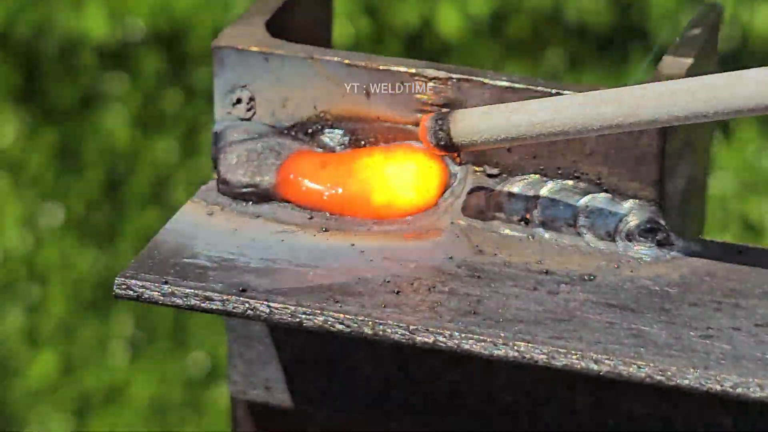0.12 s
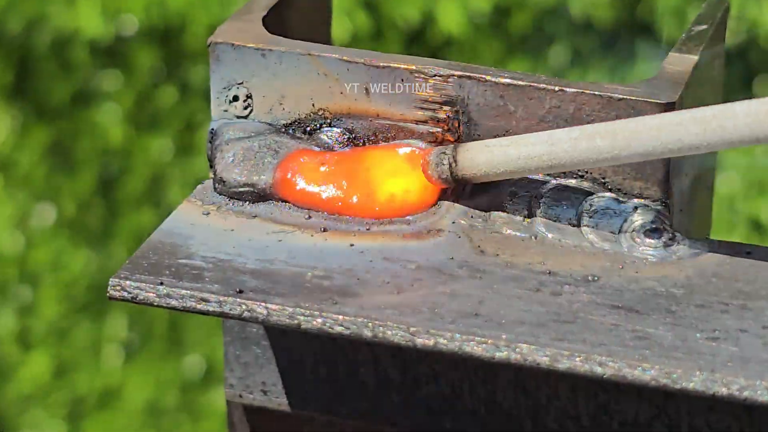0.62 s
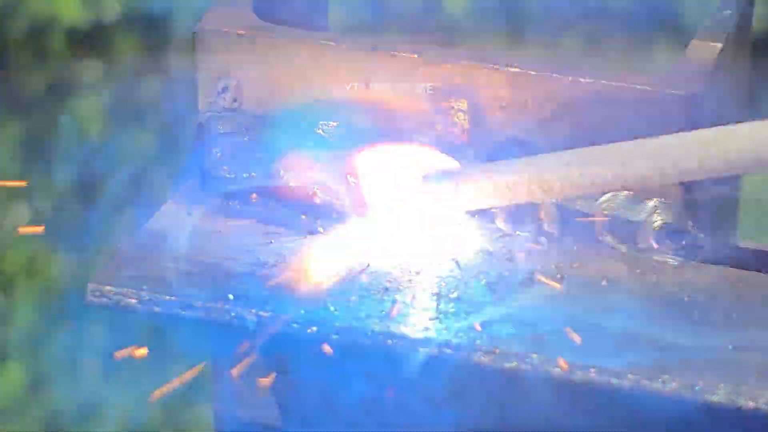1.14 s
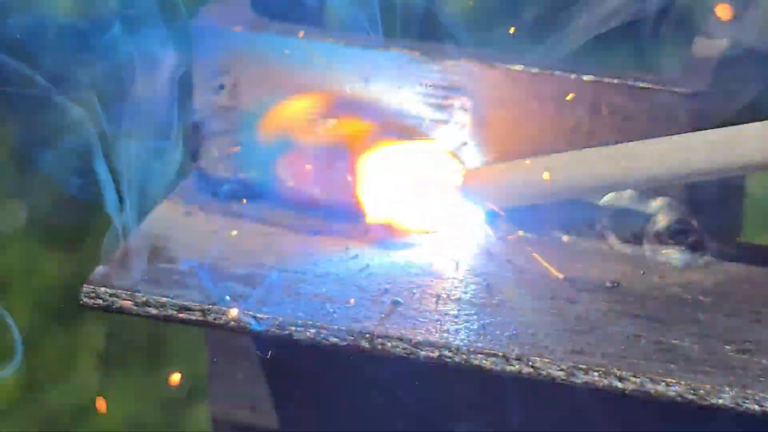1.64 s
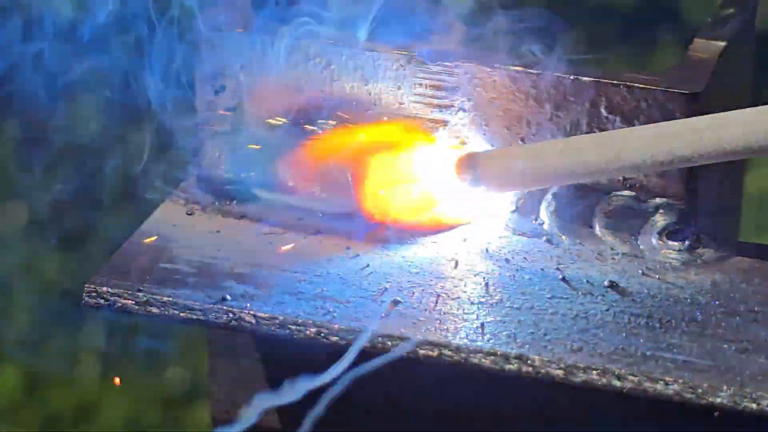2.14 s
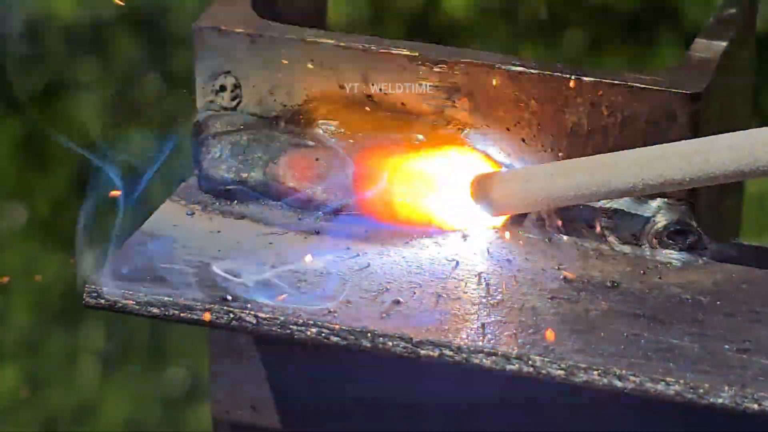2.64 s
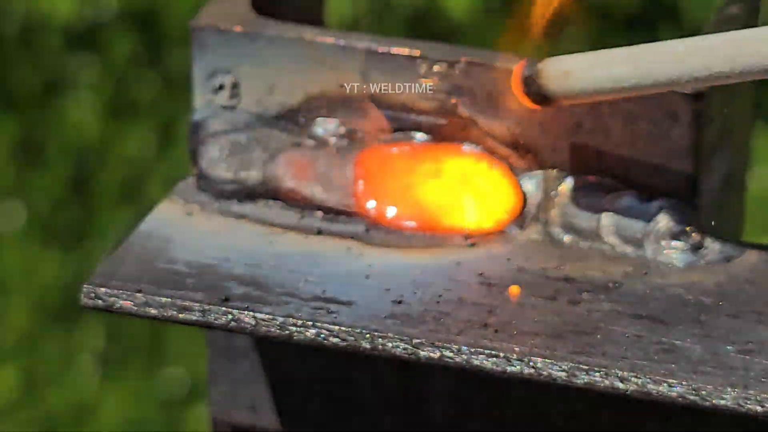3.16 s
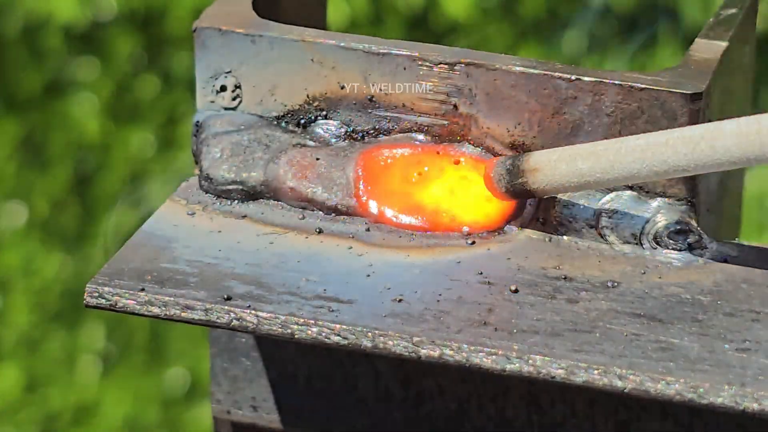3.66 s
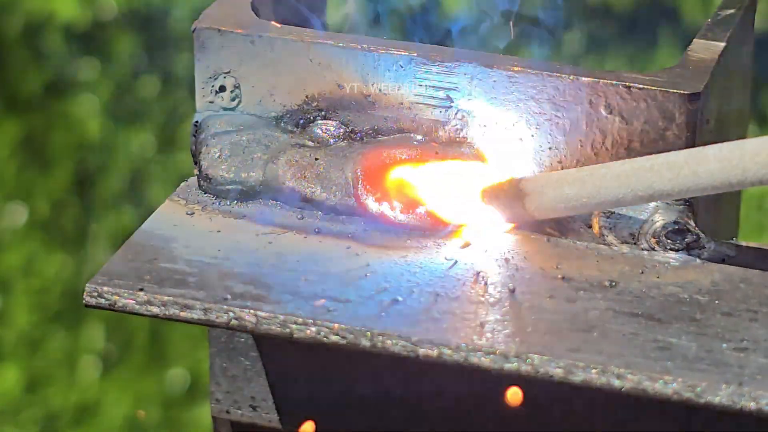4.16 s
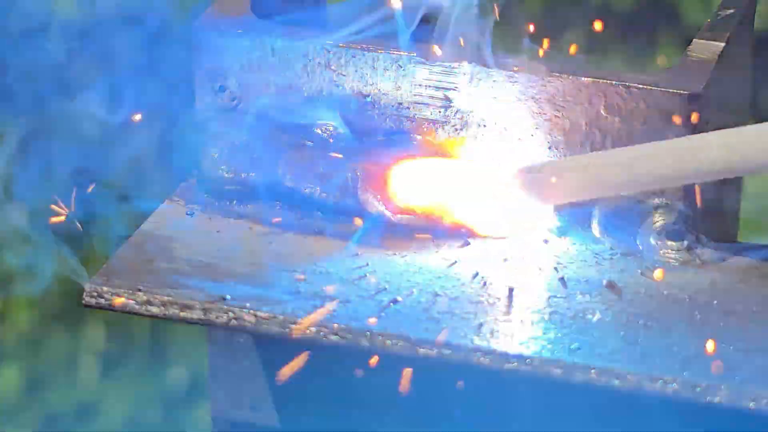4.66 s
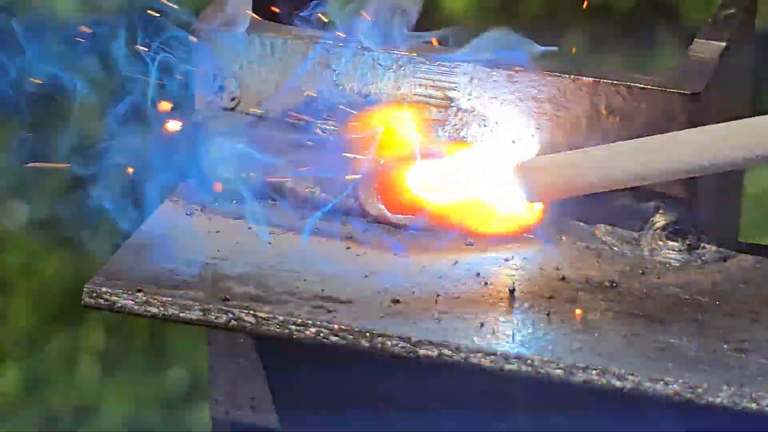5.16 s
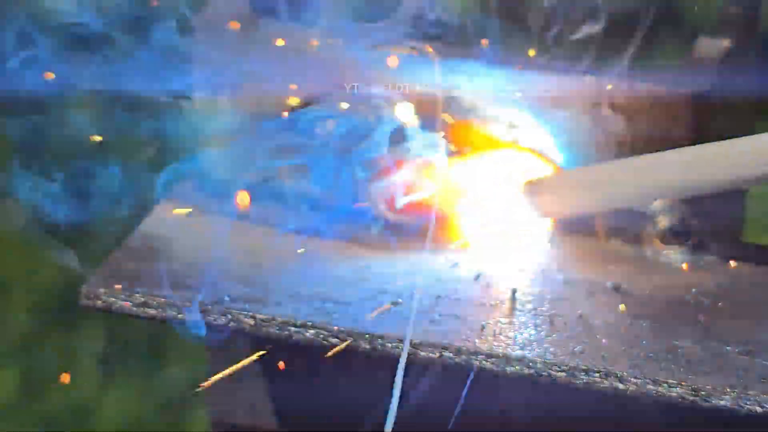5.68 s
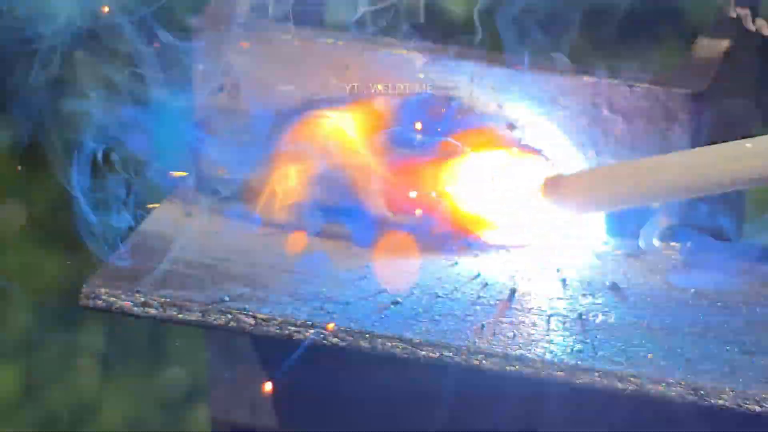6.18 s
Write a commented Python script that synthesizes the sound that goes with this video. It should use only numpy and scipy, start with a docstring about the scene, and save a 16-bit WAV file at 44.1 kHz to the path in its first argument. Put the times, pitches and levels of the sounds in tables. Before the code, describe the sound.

A welding arc strikes twice on steel in open air, hissing and snapping brightly, with near silence between and wind buffeting toward the end.

```python
"""A low wavering hum and open-air rustle come first, with wind on the microphone and a faint metallic squeak.
Then a stick electrode strikes a steel joint outdoors: noise sizzles in clumps of tiny bursts, sharp sparks ring
two resonances, and soft bands of noise make flame puffs and pool sputters. After the first weld a thin fizz sinks
and the background fades away; it returns just before the second strike. One microphone takes it all in."""
import sys
import numpy as np
from scipy import signal
from scipy.fft import rfft, irfft, next_fast_len
from scipy.io import wavfile
from scipy.ndimage import uniform_filter1d, minimum_filter1d, map_coordinates

SR = 44100
rng = np.random.default_rng(int(sys.argv[2]) if len(sys.argv) > 2 else 0)


def makeup_ratio(level_db):
    """Linear amplitude ratio for a level in decibels (20 dB per factor of ten)."""
    decades = np.asarray(level_db, float) / 20
    return 10 ** decades


def file_out(sig):
    """Save sig as 16-bit WAV at sys.argv[1]."""
    # one column per channel
    cols = np.atleast_2d(sig).T
    # limit, then scale
    lim = np.clip(cols, -1, 1)
    pcm = np.round(lim * 32767).astype(np.int16)
    wavfile.write(sys.argv[1], SR, pcm)


N = 277830  # samples, 6.3 s


def unit(x):
    """Scale to rms 1."""
    return x / np.sqrt(np.mean(x ** 2) + 1e-20)


def seconds():
    """The time of every sample."""
    return np.arange(N) / SR


def noise():
    """Fresh white noise."""
    return rng.standard_normal(N)


def wobble(rate):
    """A smooth random curve, rate knots a second."""
    knots = rng.standard_normal(int(N * rate / SR) + 4)
    return map_coordinates(knots, [np.arange(N) * rate / SR])


def curves(*tables):
    """One dB value per sample for each column; silence outside the tables."""
    t, out = seconds(), -150
    for rows in tables:
        s, *columns = np.transpose(rows)
        out = np.maximum(out, [np.interp(t, s, c, left=-150, right=-150) for c in columns])
    return out


def peaks(s, db, fall, rise=None):
    """dB per sample of swells that add in power, sloping away from their tops in dB per s."""
    coarse = np.arange(0, N, 64)
    away = coarse / SR - np.asarray(s)[:, None]
    drop = np.where(away > 0, fall * away, -(rise or fall) * away)
    power = np.sum(makeup_ratio(2 * (np.asarray(db)[:, None] - drop)), axis=0)
    return np.interp(np.arange(N), coarse, 10 * np.log10(power + 1e-30))


def filtered(x, response):
    """x times a complex response of frequency."""
    m = next_fast_len(N + 8192)
    return irfft(rfft(x, m) * response(np.fft.rfftfreq(m, 1 / SR)), m)[:N]


def coloured(x, points):
    """x through (Hz, dB) points read on a log axis."""
    f, db = np.transpose(points)
    return filtered(x, lambda hz: makeup_ratio(np.interp(np.log(hz + 1), np.log(f + 1), db)))


def resonant(x, modes):
    """x through causal (Hz, width Hz, dB) resonances, summed."""
    def response(f):
        return sum(makeup_ratio(db) * 1j * f * w / (c * c - f * f + 1j * f * w) for c, w, db in modes)
    return filtered(x, response)


def patchy(x, depth_db):
    """Random gain patches, about a kilohertz by 30 ms."""
    z = signal.stft(x, nperseg=256)[2]
    field = uniform_filter1d(rng.standard_normal(z.shape), size=7, axis=0)
    field = uniform_filter1d(field, size=10, axis=1)
    return signal.istft(z * makeup_ratio(depth_db * unit(field)), nperseg=256)[1][:N]


def spits(rate, spread_db, clump):
    """Random impulses of either sign, mostly small and rarely large, denser where clump is high."""
    chance, size, sign = rng.random(N), rng.exponential(size=N), np.sign(noise())
    height = makeup_ratio(np.minimum(spread_db * size, 4 * spread_db))
    return unit((chance < rate / SR * clump) * sign * height)


def blobs(events, life, width, offset_db):
    """Soft swells of noise, each around its own pitch; life in s, width as a share of the pitch."""
    out, t = np.zeros(N + SR), np.arange(SR // 8) / SR
    hz_axis = np.fft.rfftfreq(len(t), 1 / SR)
    swell = t / life * np.exp(1 - t / life)
    for s, db, hz in events:
        bell = 1 / (1 + ((hz_axis - hz) / (width * hz)) ** 2)
        band = irfft(rfft(rng.standard_normal(len(t))) * bell, len(t))
        out[round(s * SR):][:len(t)] += makeup_ratio(db + offset_db) * unit(band) * swell
    return out[:N]


FADE_S, RETURN_S = 2.93, 3.915  # the background dies away, then returns
FADE_DB_PER_S, FADE_DB_PER_S2 = 37, 6.5


def fade():
    """dB lost by the background between the welds; it is back within 15 ms."""
    t = seconds()
    back = np.clip(1 - (t - RETURN_S) / 0.012, 0, 1)
    since = np.clip(t - FADE_S, 0, RETURN_S - FADE_S) * back
    return -FADE_DB_PER_S * since - FADE_DB_PER_S2 * since ** 2


# Centres of the upper and lower hum tone [Hz]
HUM_TONES = (171.8, 125.5)
# Steady hum: (time [s], level [dB])
HUM_LEVEL = [(0, -52), (.75, -57), (.93, -54.5), (1.9, -51.5), (2.3, -47.5), (2.95, -45.5), (3.95, -52.5),
             (4.4, -59.5), (6.3, -58)]
# Hum swells: (time [s], upper tone level [dB], lower tone level [dB])
HUM_SWELLS = [(.05, -37, -47), (.21, -44, -61), (.46, -33, -47), (.61, -32.5, -36), (.84, -57, -45),
              (1.39, -47, -50), (2.12, -33, -58), (2.44, -49, -46), (2.58, -41.5, -56),
              (2.88, -45.5, -47.5), (4.02, -52, -58.5), (4.26, -57, -60), (5.5, -51.5, -46),
              (5.74, -43.5, -42), (5.88, -52, -45), (6.07, -46, -50), (6.25, -53, -53)]
SWELL_SLOPE_DB_PER_S, LOWER_DB = 95, -0.5  # LOWER_DB shifts the steady level of the lower tone


def hum():
    """Two low tones wander in pitch and level, each with a rough halo of resonant noise."""
    out, (s, *tops) = 0, np.transpose(HUM_SWELLS)
    for hz, top_db, under_db in zip(HUM_TONES, tops, (0, LOWER_DB)):
        steady_db = curves(HUM_LEVEL)[0] + under_db
        gain = np.hypot(makeup_ratio(steady_db), makeup_ratio(peaks(s, top_db, SWELL_SLOPE_DB_PER_S)))
        phase = 2 * np.pi * np.cumsum(hz * (1 + .03 * wobble(9))) / SR
        tone = np.sqrt(2) * np.sin(phase)
        band = [(hz, 45, 0)]
        halo = unit(resonant(resonant(noise(), band), band))
        out = out + gain * makeup_ratio(1.3 * wobble(17)) * (0.62 * tone + 0.7 * halo)
    return makeup_ratio(fade()) * out


# Breeze in the open air: (time [s], level [dB])
BREEZE_LEVEL = [(0, -48.5), (.06, -47.5), (.39, -54), (.48, -48.5), (.65, -47), (.78, -49.5), (.94, -55),
                (1.44, -48.5), (1.72, -48), (1.94, -56), (2.42, -45.5), (2.92, -47), (3.92, -50),
                (4.42, -53), (4.55, -49.5), (4.8, -52), (5.3, -52.5), (5.7, -42.5), (5.95, -49.5),
                (6.3, -45.5)]
# Gusts on the microphone: (time [s], level [dB])
MIC_GUSTS = [(.03, -54), (.6, -44), (.84, -49), (1.66, -53), (2.25, -48), (2.4, -46), (2.85, -52.5),
             (4.88, -46), (4.98, -46.5), (5.36, -51), (5.46, -41), (5.65, -43), (5.75, -29), (5.9, -48),
             (6.06, -29.5), (6.26, -42)]
# Spectra of wind on the microphone, rustle and faint hiss: (frequency [Hz], relative level [dB])
WIND_SPECTRUM = [(15, -48), (25, -17), (59, 5), (110, -1.5), (140, -35), (240, -120)]
RUSTLE_SPECTRUM = [(140, -30.5), (230, -8), (370, -3.5), (480, -7), (599, -5.5), (1070, -10), (1270, -7),
                   (1580, -14), (1900, -14.5), (2200, -17), (3500, -21.5), (4550, -56), (7700, -120)]
HISS_SPECTRUM = [(1940, -29), (3300, -6.5), (3810, -2), (4510, -3), (11100, -7.5), (14300, -19),
                 (15600, -27.5)]
GUST_SLOPE_DB_PER_S, CALM_DB = 158.5, -13.5  # calm wind relative to the breeze
HISS_DB, HISS_SWINGS, TREBLE_FADES = -64.5, 2.3, 1.2  # the last two multiply dB of breeze and of fade


def surroundings():
    """One breeze drives patchy rustle, faint hiss and lumpy wind on the microphone."""
    breeze_db, = curves(BREEZE_LEVEL)
    calm_db = breeze_db + CALM_DB + 3 * wobble(4)
    gust_db = peaks(*np.transpose(MIC_GUSTS), GUST_SLOPE_DB_PER_S)
    wind_gain = np.hypot(makeup_ratio(calm_db), makeup_ratio(gust_db))
    wind_lumps = makeup_ratio(1.9 * wobble(9.3) + 2.5 * wobble(30))
    wind = unit(wind_lumps * coloured(noise(), WIND_SPECTRUM))
    rustle_lumps = makeup_ratio(.8 * wobble(25) + 0.9 * wobble(5.7))
    rustle = unit(rustle_lumps * coloured(patchy(noise(), depth_db=2.0), RUSTLE_SPECTRUM))
    hiss = unit(coloured(noise(), HISS_SPECTRUM))
    hiss_db = HISS_DB + HISS_SWINGS * (breeze_db - breeze_db.mean()) + TREBLE_FADES * fade()
    return makeup_ratio(fade()) * (wind_gain * wind + makeup_ratio(breeze_db) * rustle) + makeup_ratio(hiss_db) * hiss


# Squeak resonances, passed twice: (frequency [Hz], width [Hz], level [dB])
SQUEAK_RESONANCES = [(2863, 44, -4), (3060, 140, -7), (3370, 60, -21), (7030, 80, -13)]


def squeak():
    """A faint thin metallic squeak: noise in a few narrow lines."""
    lines = resonant(resonant(noise(), SQUEAK_RESONANCES), SQUEAK_RESONANCES)
    level_db = peaks([0.19], [-44], fall=192, rise=150)  # s, dB, dB per s
    return makeup_ratio(level_db) * unit(lines)


# Two welds, one list each: (time [s], arc level [dB], spatter relative to the arc [dB])
WELDS = [
    [(0.806, -31.5, -24), (0.83, -16.5, -22.5), (1.1, -12, -28), (1.5, -14.5, -28.5), (1.95, -12.5, -31.5),
     (2.33, -14, -34), (2.64, -19, -29), (2.9, -24.5, -23.5), (2.96, -28, -23.5), (2.995, -47, -30)],
    [(3.92, -41, -36), (3.94, -15, -19), (4.22, -14, -29), (4.8, -12.5, -28.5), (5.3, -14, -30.5),
     (5.43, -12.5, -25), (5.46, -13, -33), (5.62, -16, -32), (5.67, -24.5, -34), (6.3, -23.5, -31)],
]
# The arc flares or chokes: (time [s], change [dB], half length [s])
ARC_FLARES = [(2.22, 3.5, 0.026), (2.47, -2.5, 0.016), (2.621, 5.5, 0.021), (2.727, 0.5, 0.034),
              (2.903, 3.5, 0.018), (5.381, -5.5, .04), (5.857, 8.5, 0.018), (5.915, 8.5, 0.0085),
              (5.961, -3, 0.073), (6.048, 4, 0.032), (6.105, -6.5, 0.08), (6.205, 1.5, 0.066)]


def strength():
    """The arc's level in dB with its flares and chokes."""
    t = seconds()
    change_db = sum(db * np.clip(1 - np.abs(t - s) / half, 0, 1) for s, db, half in ARC_FLARES)
    return curves(*WELDS)[0] + change_db


# Spectra of the sizzle and of the larger droplets: (frequency [Hz], relative level [dB])
SIZZLE_SPECTRUM = [(1940, -59), (2900, -31), (3400, -22), (3750, -12.5), (5140, -5), (7440, -4), (9780, 1),
                   (12900, 1), (14700, -6), (15600, -18.5)]
CRACKLE_SPECTRUM = [(410, -35.5), (700, -16.5), (1110, -5), (1320, -11), (1500, 2.5), (1700, -4),
                    (1960, 0.5), (2670, -3.5), (3500, -3), (4550, -22.5), (7700, -120)]
COLD_DB, WARM_S = -19.5, 0.3  # spatter lacking at the strike, time until the pool spits
FLURRY_DB, FLURRY_SLOPE_DB_PER_S = -16.5, 399.5  # small droplets around each spark
HOLLOW_HZ, HOLLOW_FOLLOWS = 4400, 0.41  # the sizzle's lower edge thins when little spatters


def arc():
    """The plasma column flutters and briefly chokes; this sets both the hiss and how densely droplets burst."""
    sizzle_db, t = strength(), seconds()
    strikes = [weld[0][0] for weld in WELDS]
    cold = sum((t >= s) * np.clip(1 - (t - s) / WARM_S, 0, 1) for s in strikes)
    spatter_db = np.maximum(curves(*WELDS)[1], -50) + COLD_DB * cold
    spark_s, spark_db = np.transpose(SPARK_SNAPS)
    flurry_db = peaks(spark_s, spark_db + FLURRY_DB, FLURRY_SLOPE_DB_PER_S)
    crackle_gain = np.hypot(makeup_ratio(sizzle_db + spatter_db + 1.3 * wobble(8)), makeup_ratio(flurry_db))

    flutter_db = 0.91 * wobble(25) + 2.4 * wobble(60) + 2.7 * wobble(300)
    # soft cap on the flutter: swells flatten, dips stay deep
    flutter_db = -2.2 * np.logaddexp(0, (1.5 - flutter_db) / 2.0)
    bursts = spits(6000, spread_db=4.5, clump=makeup_ratio(1.4 * flutter_db))
    snaps = spits(250, spread_db=2.5, clump=makeup_ratio(1.2 * flutter_db))
    hiss = unit(makeup_ratio(flutter_db + 4.2 * wobble(1200)) * noise())

    sizzle = patchy(0.76 * hiss + 0.54 * bursts, depth_db=1.15) + 0.35 * snaps
    sizzle = unit(coloured(sizzle, SIZZLE_SPECTRUM))
    lower = filtered(sizzle, lambda hz: 1 / (1 + (hz / HOLLOW_HZ) ** 8))
    lower_gain = makeup_ratio(HOLLOW_FOLLOWS * (spatter_db - spatter_db.max()))
    sizzle = sizzle + (lower_gain - 1) * lower

    # the larger droplets reach down to the midrange
    crackle = patchy(.3 * hiss + 0.3 * bursts, depth_db=3.5) + 0.7 * snaps
    crackle = unit(coloured(crackle, CRACKLE_SPECTRUM))
    return makeup_ratio(sizzle_db) * sizzle + crackle_gain * crackle


# Flame puffs: (time [s], level before the offset [dB], pitch [Hz])
FLAME_PUFFS = [(0.829, -34.5, 565), (1.519, -41, 402), (2.213, -23, 280), (2.311, -28.5, 358),
               (2.462, -29, 281), (2.612, -34, 234), (2.833, -35, 282), (5.742, -33.5, 294),
               (6.053, -26.5, 224), (6.23, -29, 224)]


def puffs():
    """Gas flares from the flux in low thumps: broad, brief swells of noise."""
    return blobs(FLAME_PUFFS, life=0.0091, width=0.42, offset_db=-8.0)


# Loudest short circuits: (time [s], level before gain and resonances [dB])
SPARK_SNAPS = [(0.9158, -34), (0.9807, -30), (0.9956, -27), (1.0226, -36.5), (1.0375, -24), (1.0803, -23.5),
               (1.255, -20), (1.3972, -28), (1.4392, -19), (1.4554, -23), (1.496, -20.5), (1.5344, -28.5),
               (1.5604, -26), (1.6039, -24.5), (1.6362, -25.5), (1.6926, -27), (1.7719, -26),
               (1.7892, -21.5), (1.884, -26.5), (1.9719, -37), (1.986, -23.5), (2.0682, -21.5),
               (2.1986, -30.5), (2.394, -21.5), (2.6135, -26.5), (2.831, -33.5), (4.0766, -30.5),
               (4.097, -22.5), (4.133, -25), (4.145, -23), (4.3365, -31), (4.4563, -28), (4.527, -21.5),
               (4.5486, -24), (4.57, -21.5), (4.595, -19.5), (4.6598, -21), (4.8444, -29.5),
               (4.8978, -26.5), (4.9237, -21), (4.9457, -21.5), (5.0075, -23.5), (5.025, -24.5),
               (5.1062, -18), (5.2175, -27.5), (5.251, -19), (5.2822, -17), (5.3158, -22), (5.3958, -28.5),
               (5.4111, -19), (5.4246, -19.5), (5.5517, -25), (5.626, -30), (5.671, -31), (5.8057, -30.5),
               (5.8442, -25), (5.8576, -25), (5.91, -26), (5.9903, -29.5), (6.0252, -27), (6.0417, -24),
               (6.1135, -30), (6.1624, -37), (6.1783, -28), (6.195, -27), (6.2148, -26.5)]
EDGE_DB, EDGE_FOLLOWS = 6, .3  # bright part over the arc strength; share of the spark's size


def sparks():
    """The loudest short circuits: single impulses ring a low and a high resonance as sharp snaps."""
    s, db = np.transpose(SPARK_SNAPS)
    at, sign = np.round(s * SR).astype(int), np.sign(rng.standard_normal(len(s)))
    low, high = [(2000, 7200, 0.0088)], [(9500, 8400, 0.0023)]  # Hz, width Hz, dB
    edge_db = strength()[at] + EDGE_DB + EDGE_FOLLOWS * (db - db.mean())
    body = resonant(resonant(np.bincount(at, sign * makeup_ratio(db + 18), N), low), low)
    edge = resonant(resonant(np.bincount(at, sign * makeup_ratio(edge_db), N), high), high)
    return body + edge


# Bubbling in the pool: (time [s], level before the offset [dB], pitch [Hz])
POOL_SPUTTERS = [(2.004, -43, 736), (2.419, -33.5, 1060), (2.918, -42, 1030), (2.91, -24, 4600),
                 (5.026, -29.5, 1010), (5.119, -43, 1180), (5.299, -39, 1120), (5.422, -36, 1140),
                 (5.718, -32.5, 1030), (5.895, -23.5, 5100), (5.907, -40, 1010), (6.04, -38, 1030),
                 (6.214, -34, 730)]


def sputters():
    """Gas bubbles out of the melt in short tuned sputters: narrow swells of noise."""
    return blobs(POOL_SPUTTERS, life=0.0085, width=0.12, offset_db=-4.5)


# Spectrum of the fizzing seam: (frequency [Hz], relative level [dB])
FIZZ_SPECTRUM = [(2350, -36), (4000, -2.5), (5500, -2), (7440, -8), (13700, -9), (15600, -11.5)]
COOL_DB, COOL_DB_PER_S, COOL_LASTS_S = -57.5, 29, 0.45


def cooling():
    """The seam fizzes on after the first weld: thin bright noise that sinks, then gives out."""
    since = seconds() - WELDS[0][-1][0]
    give_out_db = 20 * np.clip(since / COOL_LASTS_S, 0, 2) ** 4
    level_db = COOL_DB - COOL_DB_PER_S * since - give_out_db
    fizz = unit(coloured(patchy(noise(), depth_db=4.5), FIZZ_SPECTRUM))
    return (since > -.05) * makeup_ratio(level_db) * fizz


def scene():
    """All sources meet at one microphone."""
    background = hum() + surroundings() + squeak()
    weld = arc() + puffs() + sparks() + sputters() + cooling()
    return (background + weld)[None]


def band_limit(x):
    """A steep low-pass at the top of the band."""
    return signal.sosfilt(signal.butter(12, 15780, fs=SR, output="sos"), x)


CEILING, LIMIT_S, TOP_HZ = 1.03, .0005, 15740  # limiter ceiling and reach; middle of the treble roll-off


def record(dry):
    """A fast limiter catches the loudest snaps; the top treble rolls off steeply."""
    span = round(LIMIT_S * SR)
    need = np.minimum(1, CEILING / (np.abs(dry[0]) + 1e-9))
    gain = uniform_filter1d(minimum_filter1d(need, size=2 * span + 1), size=span)

    def treble_edge(hz):  # 80 Hz wide
        return np.cos(np.pi / 2 * np.clip((hz - TOP_HZ) / 80 + .5, 0, 1)) ** 2
    mix = filtered(dry[0] * gain, treble_edge)[None]
    return band_limit(mix)


dry = scene()
out = record(dry)
file_out(out)
```